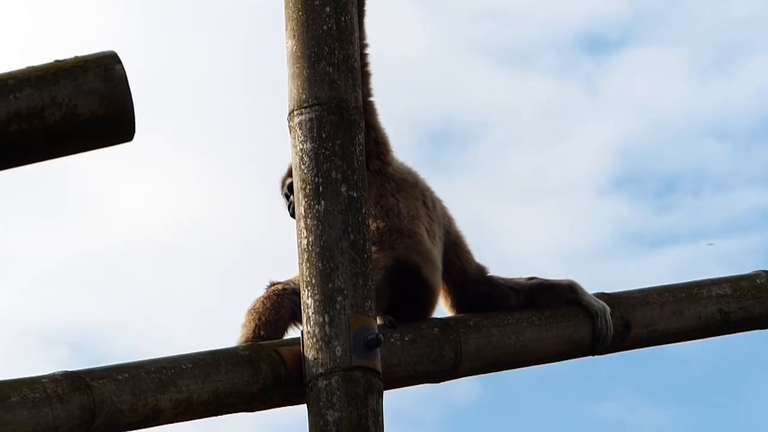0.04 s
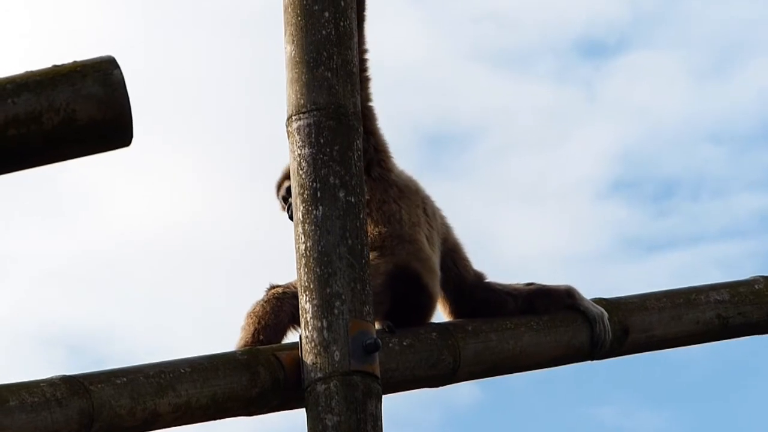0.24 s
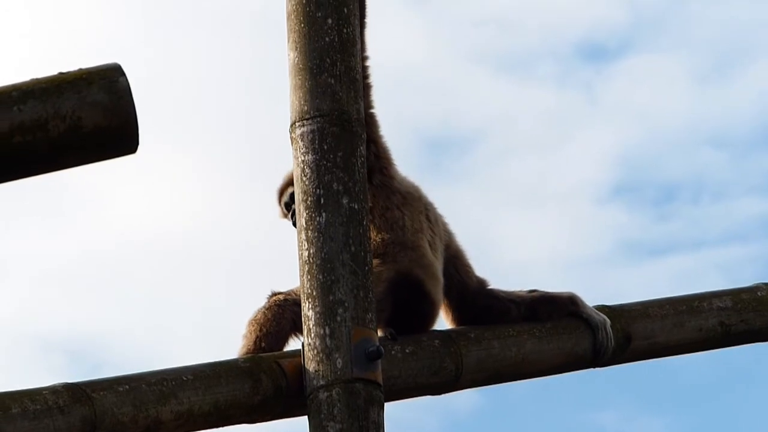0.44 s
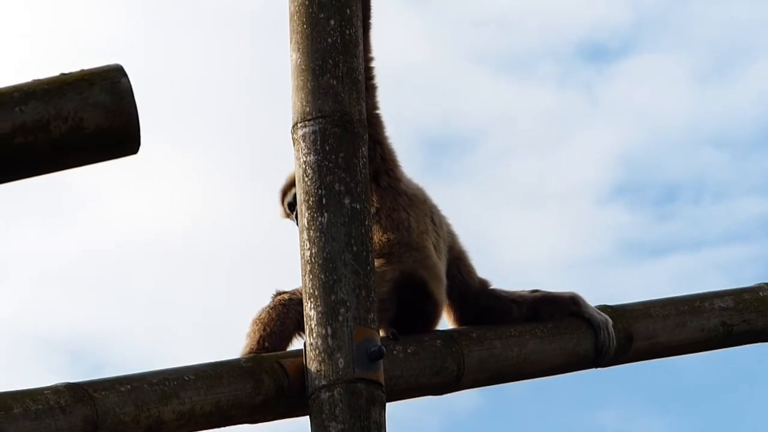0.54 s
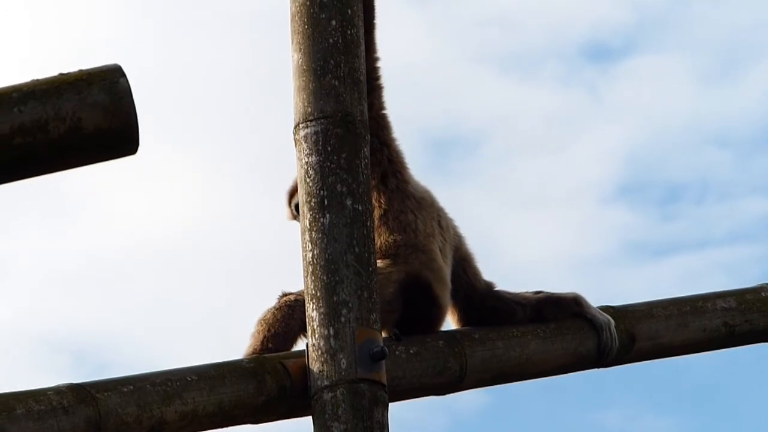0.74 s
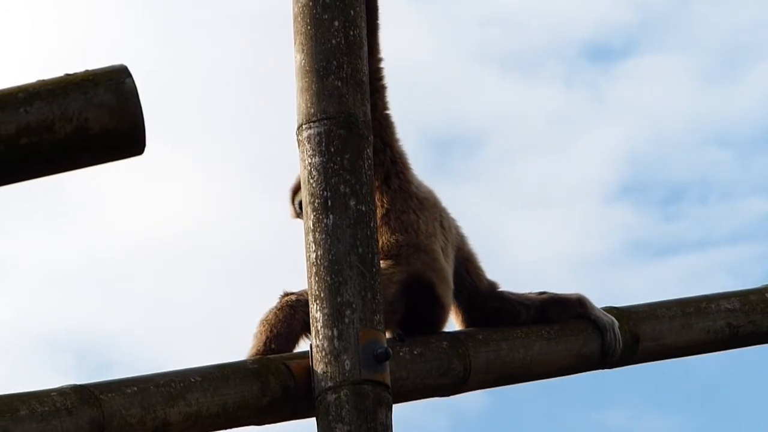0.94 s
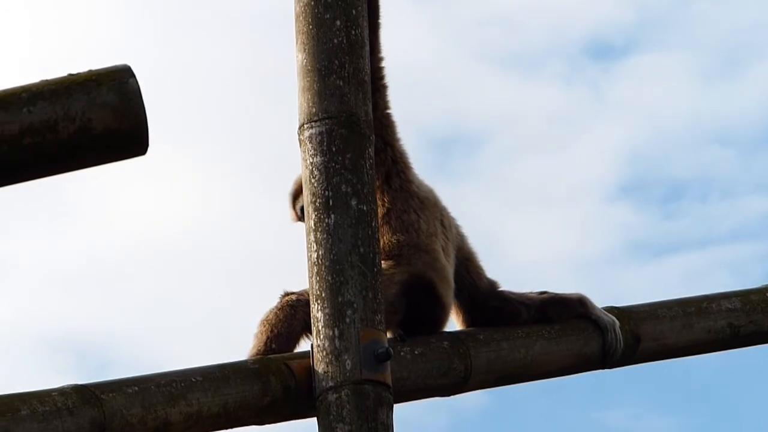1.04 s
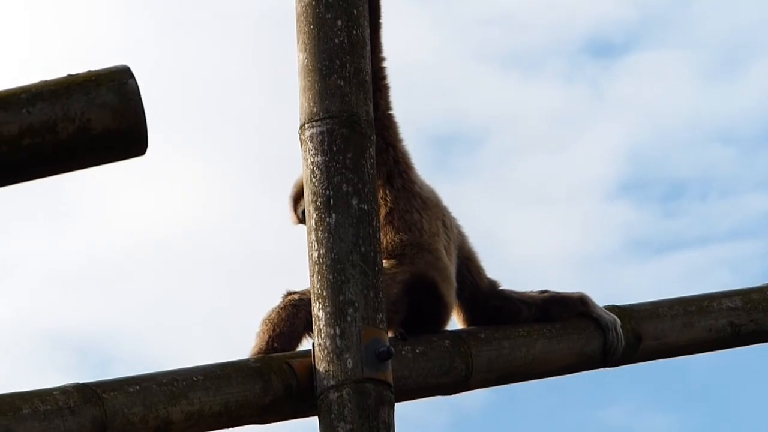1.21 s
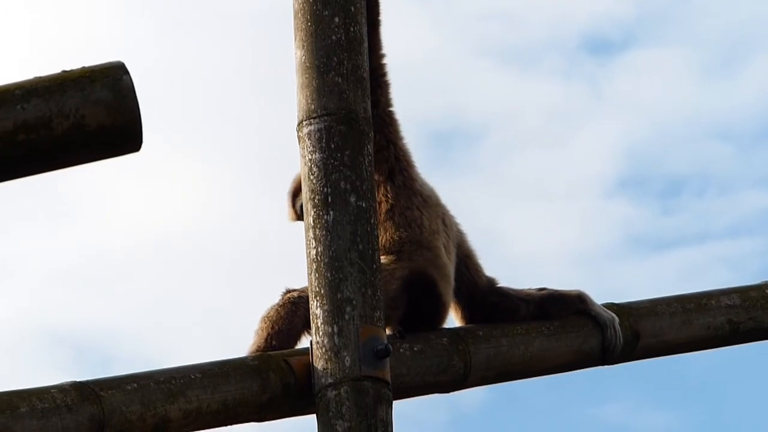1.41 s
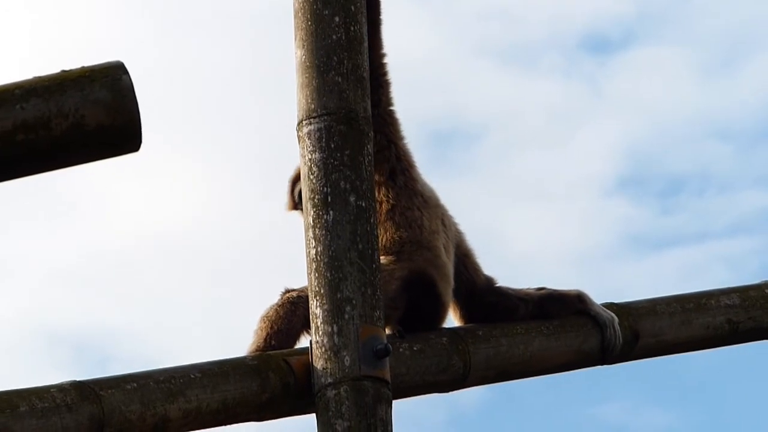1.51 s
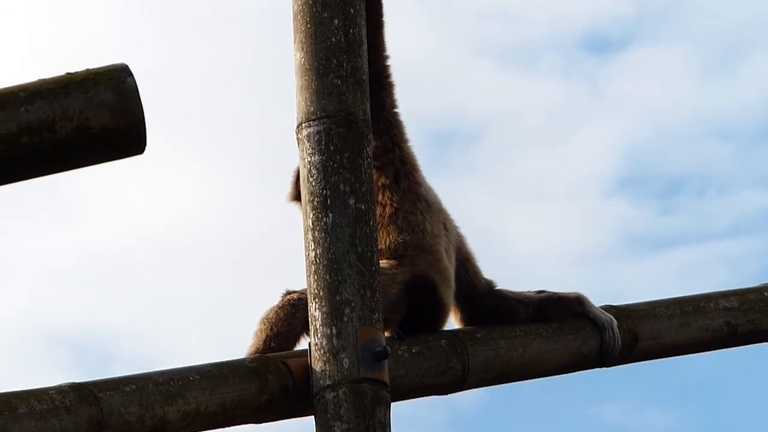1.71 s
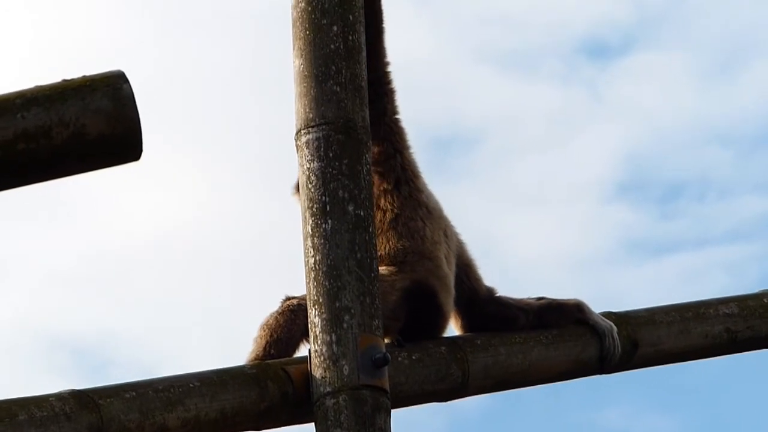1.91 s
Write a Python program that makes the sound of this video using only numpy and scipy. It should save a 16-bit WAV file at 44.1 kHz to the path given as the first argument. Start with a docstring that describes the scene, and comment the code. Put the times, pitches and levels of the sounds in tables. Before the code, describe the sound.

Loud, clear whooping calls of a gibbon slide upward and echo lightly outdoors.

```python
"""A gibbon's whoop rises out of soft outdoor hiss: three nearly pure notes from its vibrating vocal
folds, with a hoarser, two-toned note drawn inwards after the first. Its climbing frame and the
enclosure's walls reflect the calls, and faint birds whistle in the distance.
The recorder's gain control ducks everything under the loudest notes."""
import sys
import numpy as np
from scipy import signal
from scipy.fft import rfft, irfft
from scipy.io import wavfile
from scipy.ndimage import uniform_filter1d

SR = 44100
rng = np.random.default_rng(int(sys.argv[2]) if len(sys.argv) > 2 else 0)


def to_wav(sig):
    """Store sig (one row per channel, or 1-D mono) as 16-bit WAV at the path in sys.argv[1].

    Samples outside -1..1 are clipped; the rate is SR.
    """
    pcm = np.clip(np.atleast_2d(sig), -1, 1) * 32767
    pcm = np.round(pcm).astype(np.int16)
    wavfile.write(sys.argv[1], SR, pcm.T)  # frames by channels


N = 85995
TIME = np.arange(N) / SR
# Spectrum of the breath. Each row: frequency in Hz, relative density in dB.
BREATH = [(1000, -14.5), (1900, 19.5), (2250, -13.5), (2800, -11.5), (3300, 1.5), (4000, -10), (4400, -14),
          (5000, -2.5), (5800, 10), (7500, -4), (8400, 10.5), (9300, 0), (12500, -14.5)]


def whoops():
    """Vocal fold oscillation: three clean outward notes that turn unsteady and airy at high pitch."""
    # One table per note. Each row: time in seconds, pitch in Hz, level in dB,
    # then octave and upper overtone levels in dB before the throat colours them.
    notes = [
        [(.19, 646, -47.5, -100, -97.5), (.218, 697.4, -30, -74.5, -76.5), (.233, 745, -32, -59.5, -64.5),
         (.245, 776.6, -10.5, -54.5, -60.5), (.262, 939, -21.5, -75.5, -74.5), (.28, 1116, -21, -54, -60.5),
         (.302, 1256, -25, -52, -59), (.318, 1247, -26, -65, -72), (.332, 1130, -86, -60, -78)],
        [(.682, 990, -35, -82, -78.5), (.698, 935, -12, -66.5, -58.5), (.716, 874, -14.5, -57, -62.5),
         (.737, 843.2, -14, -57.5, -68), (.76, 884, -13.5, -56.5, -66), (.782, 1015, -16, -57, -61),
         (.812, 1322, -24.5, -65, -59), (.848, 1441, -23, -52, -51.5), (.875, 1440, -25, -50, -66),
         (.91, 1327, -34.5, -61, -61)],
        [(1.385, 560.7, -47.5, -82.5, -100), (1.42, 653, -39, -90.5, -83.5), (1.452, 740, -30, -65, -80),
         (1.467, 736, -38, -60, -71), (1.479, 746, -20, -59, -73), (1.501, 879, -21, -72, -73),
         (1.535, 1070, -24, -52, -59.5), (1.55, 1093, -30.5, -38.5, -61), (1.564, 1082, -34.5, -54, -81),
         (1.595, 1094, -40, -64, -90)],
    ]
    tilts_db_per_octave = [-1, 5.5, -2.5]
    fray_from_hz = 1300
    out = np.zeros(N)
    for rows, tilt in zip(notes, tilts_db_per_octave):
        gate, hz, db, octave_db, upper_db = contours(rows)
        fray = np.clip((hz - fray_from_hz) / 150, 0, 1)
        phase = oscillator_phase(hz, jitter=0.0019 + 0.0034 * fray)
        tone = voice(phase, hz, db, octave_db, upper_db, tilt)
        air = fray * amp(upper_db + 1) * shaped_noise(BREATH)
        out += gate * (tone + air)
    return out


def inward_note():
    """Biphonation: two oscillators sound together and make sum tones, over rushing air."""
    # Each row: time in seconds, pitch in Hz, level in dB, overtone level before the throat in dB,
    # second tone in Hz, its level in dB, air level in dB.
    note = [(.462, 845, -45.5, -95, 1487, -81.5, -82.5), (.5, 952, -24.5, -66, 1559, -71.5, -64),
            (.53, 1060, -24, -72.5, 1647, -45.5, -56), (.558, 1182, -35, -61, 1724, -62, -62),
            (.572, 1235, -21.5, -59, 1747, -51, -55), (.598, 1342, -35.5, -65, 1840, -61, -58),
            (.628, 1434, -24.5, -49.5, 1860, -48, -59), (.655, 1461, -36.5, -59.5, 1875, -55, -62.5),
            (.68, 1390, -49, -76, 1790, -59, -61)]
    # Sum tones at the second tone plus 1, 2 and 3 times the pitch, in dB relative to the second tone.
    sidebands_db = [-13, -14, -15.5]
    gate, hz, db, overtone_db, second_hz, second_db, air_db = contours(note)
    first = oscillator_phase(hz, jitter=0.0021)
    second = oscillator_phase(second_hz, jitter=0.0063)
    sidebands = sum(amp(level) * np.sin(second + k * first) for k, level in enumerate(sidebands_db, 1))
    tones = voice(first, hz, db, overtone_db, overtone_db, tilt_db_per_octave=-3)
    tones += amp(second_db) * (np.sin(second) + sidebands)
    return gate * (tones + amp(air_db) * shaped_noise(BREATH))


def voice(phase, hz, db, octave_db, upper_db, tilt_db_per_octave):
    """Source and filter: a strong fundamental with weak, fluttering overtones coloured by the throat."""
    # Response of the throat. Each row: overtone frequency in Hz, gain in dB.
    throat = [(1200, 28), (1500, 3.5), (1750, 16), (1950, 3.5), (2170, -7.5), (2300, -11.5), (2550, 3),
              (2850, -6.5), (3300, -17.5), (3800, -2), (4200, -2.5), (4450, -35), (4750, 1.5), (5300, -4),
              (5650, -12.5), (6300, -12.5), (8400, -37.5), (12000, -39)]
    flutter_db, smear_rad = 2, 0.07
    blurred = phase + smear_rad * drift(rate_hz=300)  # uneven cycles blur the highest overtones most
    overtones = []
    for k in range(2, 9):
        colour_db = spectrum_at(throat, k * hz) + tilt_db_per_octave * np.log2(k * hz / 2000)
        overtones.append(amp(colour_db + flutter_db * drift(rate_hz=90)) * np.sin(k * blurred))
    octave, *upper = overtones
    return np.sqrt(2) * (amp(db) * np.sin(phase) + amp(octave_db) * octave + amp(upper_db) * sum(upper))


def close_bounce(x):
    """Comb filtering: a close surface's reflection hollows out pitches that the notes sweep through."""
    return x + amp(-5.5) * delayed(x, seconds=0.004649)


def microphone_pair(x):
    """Level and phase differences: two microphones hear the call differently, most around 2 kHz."""
    # Each row: frequency in Hz, left minus right level in dB.
    level_difference = [(1450, 0.3), (1750, 0), (2150, -10), (2500, 0), (5000, 1.5)]
    # Each row: frequency in Hz, phase lead of the left in radians.
    phase_lead = [(1450, 0.24), (1750, 1), (2150, 1.3), (2600, .4), (5000, 0.58)]
    hz = np.fft.rfftfreq(N, 1 / SR)
    left = amp(spectrum_at(level_difference, hz) / 2) * np.exp(.5j * spectrum_at(phase_lead, hz))
    return irfft(rfft(x) * np.array([left, 1 / left]), N)


def wall_echoes(x):
    """Specular reflection: each nearby wall returns one distinct early echo."""
    # Each row: delay in seconds, left gain in dB, right gain in dB.
    reflections = [(.0235, -9.5, -15.5), (.0312, -27.5, -19), (.046, -31.5, -33.5)]
    return sum(amp([[left], [right]]) * delayed(x, delay) for delay, left, right in reflections)


def reverberation(x):
    """Diffuse reflection: quick scatter from the frame, a tail and a late wash from the surroundings."""
    # Each row: frequency in Hz, seconds for the tail to fall 60 dB.
    decay_times = [(300, 0.74), (900, 0.99), (1400, 0.97), (1720, 0.9), (2400, 0.55), (2900, 0.91),
                   (4200, 0.95), (5800, 2.3), (7400, 0.81)]
    # Colour of all three parts. Each row: frequency in Hz, gain in dB.
    colour = [(700, -1.5), (860, -10.5), (970, -2), (1080, 4.5), (1300, 4), (1450, -8.5), (1720, 7.5),
              (2200, 8.5), (2480, 6.5), (2850, 5.5), (3700, 8), (4200, 11), (4900, -1), (5800, 10),
              (9000, 10)]
    mid, side = even_noise(), amp(-5.5) * even_noise()
    hz, t, spectra = signal.stft(unit_rms(np.array([mid + side, mid - side])), SR, nperseg=256)

    def decay(db, t60):
        """Exponential decay of power, with a total energy that does not depend on t60."""
        return amp(db - 60 * t / t60) ** 2 * 2 * np.log(1000) / (t60 * SR)

    scatter = decay(db=-13, t60=0.097)
    tail = decay(db=-10, t60=spectrum_at(decay_times, hz)[:, None])
    wash = decay(db=-20, t60=3) * np.clip(t / 0.32, 0, 1) ** 2  # builds up over 0.32 s
    spectra *= np.sqrt(scatter + tail + wash) * amp(spectrum_at(colour, hz))[:, None]
    response = signal.istft(spectra, SR, nperseg=256)[1]
    return signal.fftconvolve(delayed(x, seconds=0.02)[None], response, axes=1)[:, :N]


def birds():
    """Frequency glides: thin, faint whistles, each placed by its level difference between channels."""
    # Each row: start and length in seconds, first and last pitch in Hz, level in dB,
    # jitter as a share of pitch, right minus left level in dB.
    calls = [(-.03, 0.14, 2237, 2096, -65, 0.032, 18), (0.307, 0.082, 8940, 8330, -66.5, 0.021, 4),
             (.985, 0.093, 5710, 5280, -64, .05, 4), (1.011, 0.1, 7500, 7110, -61, 0.0035, 0),
             (1.104, 0.05, 7395, 7150, -71.5, 0.011, 1), (1.184, 0.11, 6920, 6665, -66.5, 0.0026, 3.5),
             (1.72, 0.0415, 2400, 2600, -58.5, 0.012, 8), (1.745, 0.14, 2190, 2079, -63.5, 0.015, 23)]
    out = np.zeros((2, N))
    for start, length, first_hz, last_hz, db, jitter, pan_db in calls:
        progress = np.clip((TIME - start) / length, 0, 1)
        envelope = np.sqrt(abs(2 * np.sin(np.pi * progress)))
        phase = oscillator_phase(first_hz + (last_hz - first_hz) * progress, jitter)
        out += amp([[db - pan_db / 2], [db + pan_db / 2]]) * envelope * np.sin(phase)
    return out


def outdoor_hiss():
    """Partly coherent noise: a wide low rumble, a midrange wash and hiss, all softly patchy."""
    # Each row: frequency in Hz, relative density in dB.
    density = [(15, -50), (25, -33), (43, -26.5), (85, 0), (140, -1), (191, -3.5), (290, -3), (385, -3),
               (470, -8.5), (651, -10.5), (890, -6), (963, -4.5), (1190, -4), (1580, -16.5), (2110, -18),
               (2280, -23.5), (3370, -27), (3950, -27), (4400, -28), (5100, -19), (6460, -23), (9000, -28),
               (12700, -35.5)]
    # Each row: frequency in Hz, correlation of left and right from -1 to 1.
    correlation = [(40, -0.37), (120, -0.48), (300, -0.83), (600, -0.062), (1000, 0.63), (2000, -0.17),
                   (4000, 0.85), (8000, 0.53), (12000, 0.52)]
    level_db, patchy_db = -49.5, 1.5
    hz = np.fft.rfftfreq(1024, 1 / SR)
    left_re, left_im, other_re, other_im, patches = rng.standard_normal((N // 256 + 5, 513, 5)).T
    patches = uniform_filter1d(patches, size=8, axis=0)  # across frequency
    patches = unit_rms(uniform_filter1d(patches, size=12, axis=1))  # across time
    likeness = spectrum_at(correlation, hz)[:, None]
    left = left_re + 1j * left_im
    right = likeness * left + np.sqrt(1 - likeness ** 2) * (other_re + 1j * other_im)
    spectra = np.array([left, right]) * amp(spectrum_at(density, hz)[:, None] + patchy_db * patches)
    return amp(level_db) * unit_rms(signal.istft(spectra, nperseg=1024, noverlap=768)[1][:, :N])


def contours(rows, glide_s=0.021):
    """Smoothing: a soft gate over the note, then each column after time as a gliding curve."""
    times, *columns = np.transpose(rows)
    window = signal.get_window("hann", 2 * int(glide_s * SR / 2) + 2)
    gate = 1. * ((TIME > times[0]) & (TIME < times[-1]))
    curves = [gate] + [np.interp(TIME, times, column) for column in columns]
    return [signal.fftconvolve(c - c[0], window / window.sum(), "same") + c[0] for c in curves]


def oscillator_phase(hz, jitter):
    """Phase is the integral of frequency, which here wavers by the share `jitter`."""
    return 2 * np.pi * np.cumsum(hz * (1 + jitter * drift(rate_hz=216))) / SR


def drift(rate_hz):
    """Low-pass noise: random drift up to the given rate."""
    rolloff = 1 + (np.fft.rfftfreq(N, 1 / SR) / rate_hz) ** 4
    return unit_rms(irfft(rfft(rng.standard_normal(N)) / rolloff, N))


def shaped_noise(points):
    """Spectral shaping: white noise filtered to the given spectrum."""
    gain = amp(spectrum_at(points, np.fft.rfftfreq(N, 1 / SR)))
    return unit_rms(irfft(rfft(rng.standard_normal(N)) * gain, N))


def even_noise():
    """Whitening: noise with its swells levelled at every pitch, so its echoes fade smoothly."""
    x = rng.standard_normal(N)
    for _ in range(12):
        spectra = signal.stft(x, nperseg=2048)[2]
        x = signal.istft(spectra / (abs(spectra) + 1e-12), nperseg=2048)[1][:N]
    return unit_rms(x)


def spectrum_at(points, hz):
    """Interpolation on a log-frequency axis."""
    frequencies, values = np.transpose(points)
    return np.interp(np.log(hz + 1), np.log(frequencies), values)


def delayed(x, seconds):
    """Propagation delay: the same sound, later."""
    return np.interp(TIME - seconds, TIME, x, left=0)


def amp(db):
    """Decibels to amplitude ratio."""
    return 10 ** (np.asarray(db) / 20)


def unit_rms(x):
    """Normalisation to rms 1."""
    return x / np.sqrt(np.mean(x ** 2) + 1e-20)


def scene():
    """Superposition: the gibbon straight ahead, with reflections, birds and hiss around it."""
    gibbon = whoops() + inward_note()
    whistles = birds()
    near = amp(2) * microphone_pair(close_bounce(gibbon))
    reflected = wall_echoes(gibbon) + reverberation(gibbon + amp(-4) * whistles.mean(0))
    return near + reflected + whistles + outdoor_hiss()


def record(dry):
    """Compression: after a low cut, gain control ducks the loudest notes; a band limit follows."""
    low_cut_hz, band_limit_hz = 107, 12600
    threshold_db, duck_share, recover_db_per_s = -17.5, 0.78, 38.5
    dry = signal.sosfilt(signal.butter(2, low_cut_hz, "high", fs=SR, output="sos"), dry)
    power_db = 10 * np.log10(abs(uniform_filter1d((dry ** 2).mean(0), size=400)) + 1e-12)
    fall_db = TIME * recover_db_per_s
    held_db = np.maximum.accumulate(power_db + fall_db) - fall_db  # jumps to each peak, then sinks
    over_db = np.maximum(held_db - threshold_db, 0)
    ducked = dry / amp(duck_share * uniform_filter1d(over_db, size=200))
    low_pass = signal.firwin(511, band_limit_hz, window=("kaiser", 9), fs=SR)
    return signal.oaconvolve(ducked, low_pass[None], "same")


dry = scene()
out = record(dry)
to_wav(out)
```